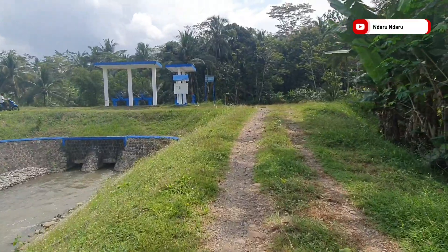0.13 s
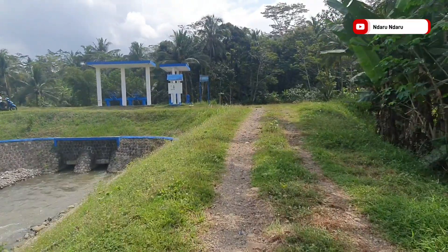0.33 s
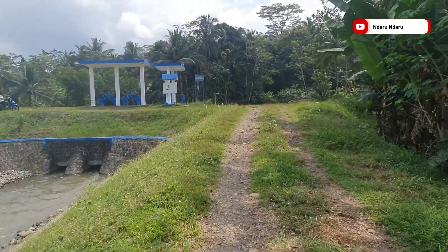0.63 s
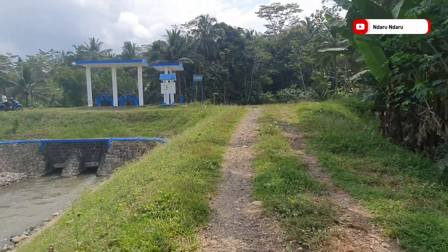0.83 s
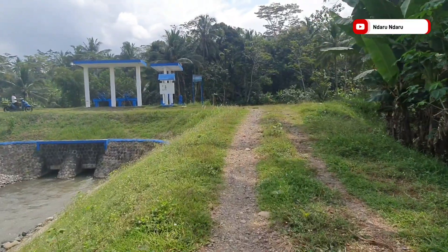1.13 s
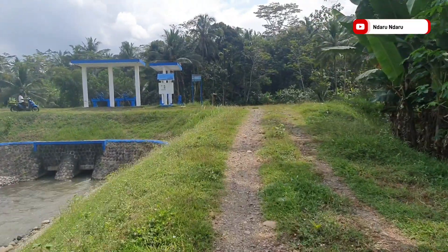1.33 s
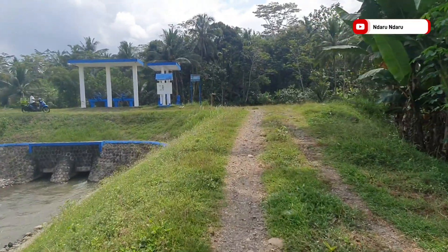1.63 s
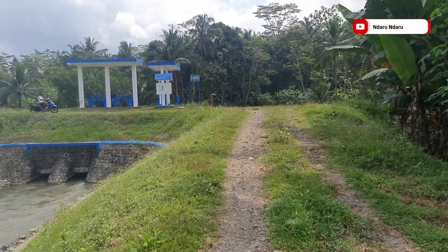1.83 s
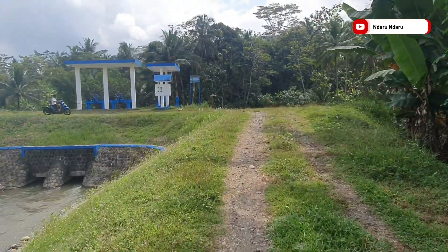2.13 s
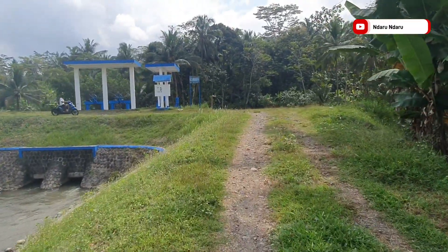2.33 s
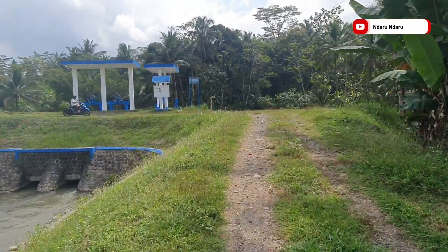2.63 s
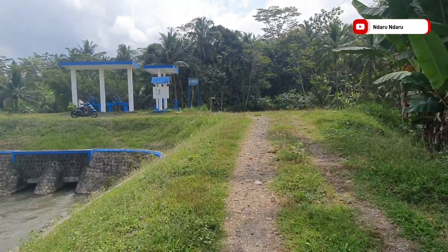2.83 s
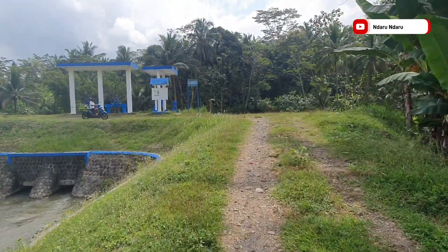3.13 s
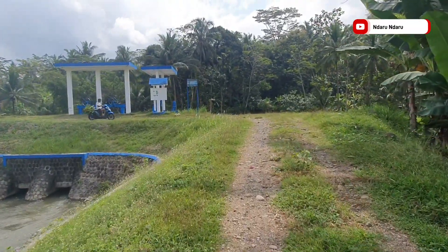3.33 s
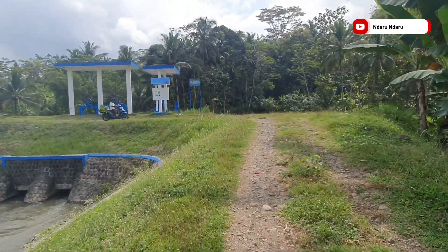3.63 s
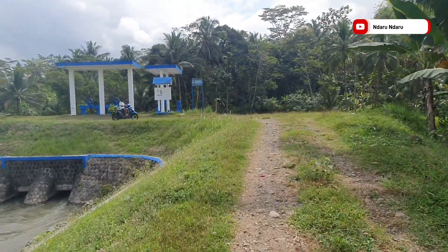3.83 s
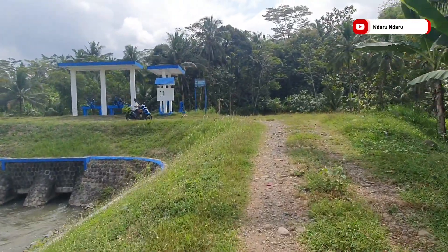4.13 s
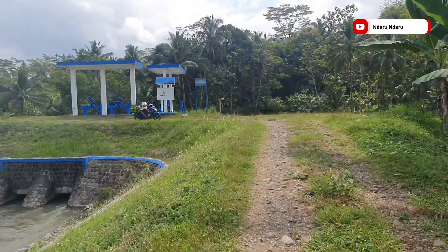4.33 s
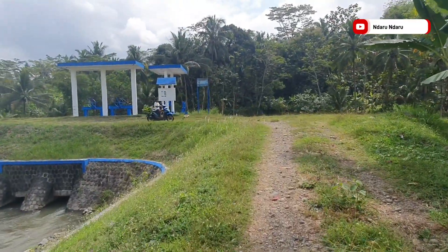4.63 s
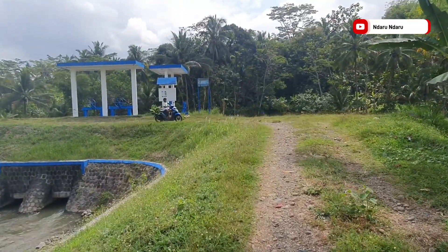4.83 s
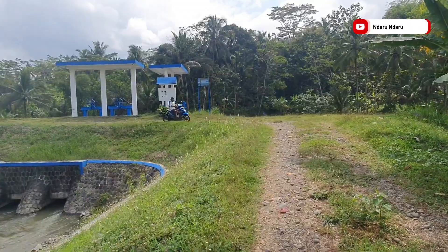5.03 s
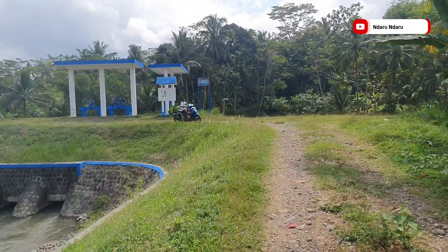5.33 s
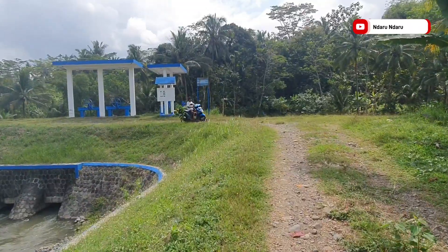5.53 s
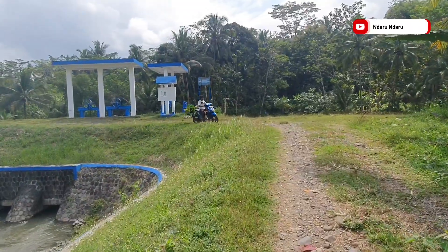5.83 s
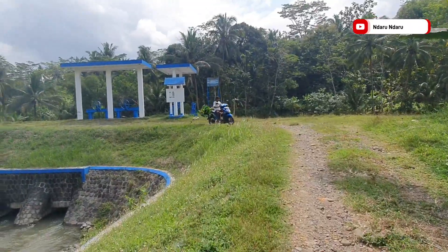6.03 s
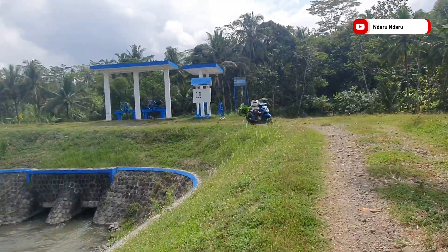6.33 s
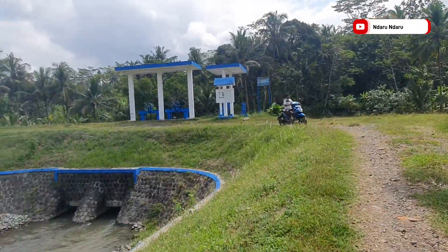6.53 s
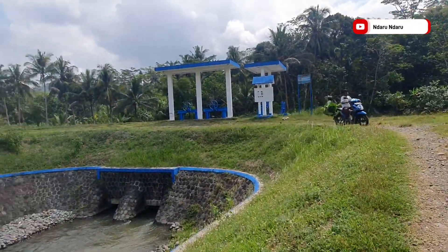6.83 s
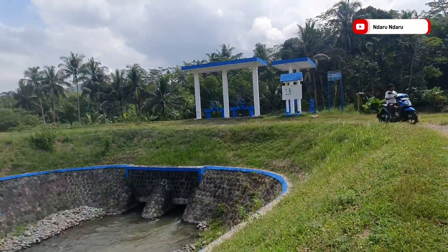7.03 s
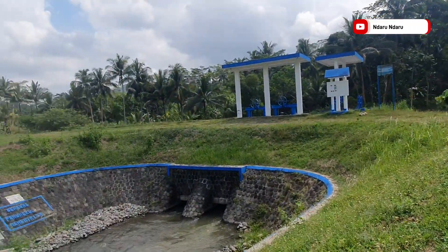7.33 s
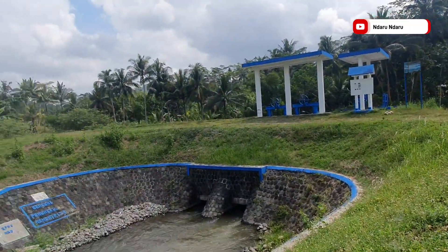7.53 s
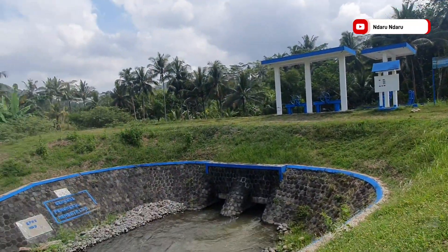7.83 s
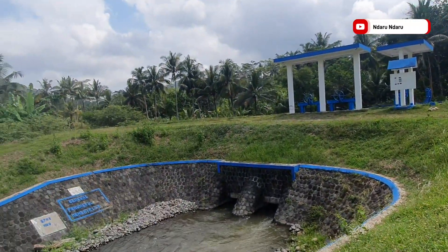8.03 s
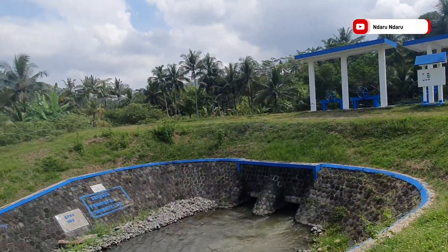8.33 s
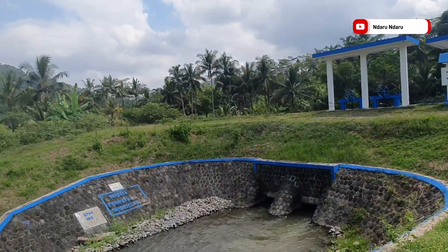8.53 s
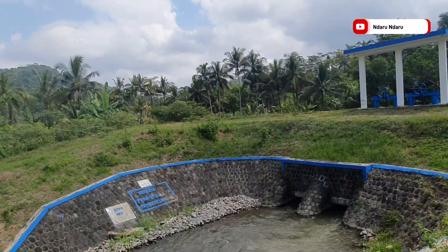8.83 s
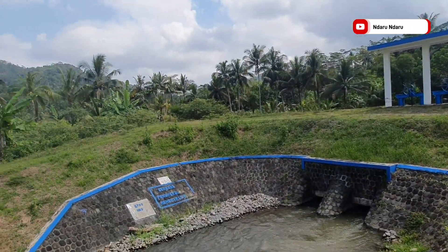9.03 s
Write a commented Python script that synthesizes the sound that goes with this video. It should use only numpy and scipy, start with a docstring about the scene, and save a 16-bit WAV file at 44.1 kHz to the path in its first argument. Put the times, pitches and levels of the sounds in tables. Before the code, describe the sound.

A continuous, grainy hiss of canal water and grit under rolling wheels lasts about nine seconds, nearly level, with tiny fast flickers across its bands. At 0 s a tight burst of hard stone pops strikes, then single pops and bubbly clicks scatter, with clearer knocks near 1.3, 1.6 and 3.2 s. A flurry of small clicks comes around 3.8 s, a dense low gravel crunch at 4.5 s, and a looser patter at 5.1 s. Thin metal pings touch at 5.3 and 6.7 s; a soft crunch falls at 5.75 s. From 6.7 to 7.4 s the hiss shifts colour as the microphone turns towards the water, with several knocks near 7.1 s. Pops then thin out, with one last dry knock near 9.1 s. Very faint rumble and distant motorbike hum stay beneath, in close, dry, uneven stereo.

```python
"""Gravel track beside a canal

A camera rolls slowly beside a stone-lined canal. Water and grit under the wheels make an even, grainy hiss:
noise mixed with ringing grains, flickering band by band. Stones and bubbles pop as short decaying tones;
noise bursts tick and thin metal pings in the treble. Far off lie a low noise rumble and a motorbike's sine hum.
Two microphone ports on the camera body hear it all with unequal colour and phase.
"""
import sys
import numpy as np
from scipy import signal
from scipy.fft import rfft, irfft, next_fast_len
from scipy.io import wavfile
from scipy.ndimage import map_coordinates

SR = 44100
rng = np.random.default_rng(int(sys.argv[2]) if len(sys.argv) > 2 else 0)


def to_wav(sig):
    """Store sig (one row per channel, or 1-D mono) as 16-bit WAV at the path in sys.argv[1].

    Samples outside -1..1 are clipped; the rate is SR.
    """
    pcm = np.clip(np.atleast_2d(sig), -1, 1) * 32767
    pcm = np.round(pcm).astype(np.int16)
    wavfile.write(sys.argv[1], SR, pcm.T)  # frames by channels


N = 405719


def from_db(db):
    """Decibels to gain."""
    return 10 ** (np.asarray(db) / 20)


def rms_one(x):
    """Scale to unit rms."""
    return x / np.sqrt(np.mean(x ** 2) + 1e-20)


def at_hz(rows, hz):
    """Columns of a colour table, read on a log-frequency axis."""
    f, *columns = np.transpose(rows)
    return [np.interp(np.log(hz + 1), np.log(f), column) for column in columns]


def in_time(rows):
    """Columns of a time curve, read at every sample."""
    s, *columns = np.transpose(rows)
    return [np.interp(np.arange(N) / SR, s, column) for column in columns]


def drift(rate_hz):
    """Slow random wander of unit rms: noise twice through a one-pole low-pass, at a twentieth of the rate."""
    pole = np.exp(-40 * np.pi * rate_hz / SR)
    noise = rng.standard_normal(N // 20 + 4002)
    slow = signal.lfilter([1], [1, -2 * pole, pole * pole], noise)[4000:]   # skip the settling
    return np.interp(np.arange(N) / 20, np.arange(len(slow)), rms_one(slow))


def filtered(x, response):
    """Apply a complex response given as a function of frequency."""
    size = next_fast_len(N + 4096)
    hz = np.arange(size // 2 + 1) * SR / size
    return irfft(rfft(x, size) * response(hz), size)[..., :N]


def add_ring(out, at_s, peak_db, hz, rise_s):
    """Add a sine that swells for rise_s and then dies away."""
    t = np.arange(int(12 * rise_s * SR)) / SR
    envelope = from_db(peak_db) * t / rise_s * np.exp(1 - t / rise_s)
    ring = envelope * np.sin(2 * np.pi * hz * t)
    start = round(at_s * SR)
    out[start:start + len(t)] += ring[:N - start]


# Colour of the far engine and air. Each row: frequency in Hz, density in dB per Hz.
RUMBLE_COLOUR = [(24, -24), (45, -10), (65, 5), (115, 3), (160, -23), (400, 2)]
# Swell of the rumble. Each row: time in seconds, level in dB at the right port.
RUMBLE_LEVEL = [(0, -76.5), (2.2, -77), (3.5, -73), (5, -81), (6, -75), (7.2, -73.5), (8.2, -77),
                (9.2, -77)]


def rumble():
    """Far engine and air: noise below 500 Hz, drawn separately for each port and weaker at the left."""
    noise = rng.standard_normal((2, N))
    low = filtered(noise, lambda hz: from_db(at_hz(RUMBLE_COLOUR, hz)[0]) * (hz < 500))
    return from_db(in_time(RUMBLE_LEVEL)[0]) * rms_one(low) * from_db([[-10.5], [0]])


# Firing note of a far motorbike. Each row: time in seconds, centre pitch in Hz,
# centre peak level in dB at the right port.
MOTORBIKE_NOTE = [(0, 62, -96), (4.2, 66, -90), (4.6, 66, -82), (5.4, 65, -80), (5.8, 53, -90),
                  (6.25, 57, -77), (6.6, 58, -86), (7.3, 63, -83), (8.1, 64, -82), (8.4, 65, -88),
                  (9.2, 66, -83)]


def engine_hum():
    """The motorbike's firing note: one sine, wavering a little in pitch and level."""
    hz, level_db = in_time(MOTORBIKE_NOTE)
    wavering_hz = hz * (1 + 0.0202 * drift(2.6))
    phase = 2 * np.pi * np.cumsum(wavering_hz) / SR
    return from_db(level_db + 3.5 * drift(3.3)) * np.sin(phase) * from_db([[-10.5], [0]])


# Bright ticks. Each row: start in seconds, starting noise level in dB before the high-pass.
TICK_HITS = [(0.188, -48), (0.5636, -50), (0.5831, -45), (1.3139, -48), (2.7422, -58), (3.1727, -42),
             (3.756, -39), (4.0138, -50), (5.0604, -48), (5.2984, -44), (5.3774, -62), (6.7251, -51),
             (7.9678, -41), (8.6567, -41)]
TICK_T60_S, TICK_LOW_HZ = 0.013, 9850


def ticks():
    """High-passed noise bursts with a fast decay, drawn separately for each port."""
    out = np.zeros((2, N))
    decay_db = -60 * np.arange(400) / SR / TICK_T60_S
    for s, peak_db in TICK_HITS:
        start = round(s * SR)
        out[:, start:start + 400] += rng.standard_normal((2, 400)) * from_db(peak_db + decay_db)
    return signal.sosfilt(signal.butter(3, TICK_LOW_HZ, "high", fs=SR, output="sos"), out)


# Touches of a small metal part. Each row: start in seconds, peak in dB at the right port.
METAL_TOUCHES = [(5.289, -51), (5.297, -44), (6.74, -48)]
PING_HZ, PING_RISE_S, PING_LEFT_DB = 13250, .002, -17


def pings():
    """A small metal part rings one thin high tone, much weaker at the left port."""
    ping = np.zeros(N)
    for s, peak_db in METAL_TOUCHES:
        add_ring(ping, s, peak_db, PING_HZ, PING_RISE_S)
    return ping * from_db([[PING_LEFT_DB], [0]])


PEBBLE_SPREAD_DB = 2.5   # either side of the mean
PEBBLE_CYCLES = 4.7      # at 1 kHz


def pebbles(start_s, length_s, per_s, mean_db, low_hz, high_hz, cycles=PEBBLE_CYCLES):
    """Rows of small hits at random times and pitches, coloured by the port; higher ones ring more cycles."""
    when, size, pitch = rng.random((round(per_s * length_s), 3)).T
    hz = low_hz * (high_hz / low_hz) ** pitch
    peak_db = mean_db + at_hz(RIGHT_PORT_COLOUR, hz)[0] + PEBBLE_SPREAD_DB * (2 * size - 1)
    return np.transpose([start_s + when * length_s, peak_db, hz, cycles * np.sqrt(hz / 1000)])


# Loose gravel giving way in dense runs of low stones. Each row: start in seconds, length in seconds,
# mean peak in dB before the port's colour.
GRAVEL_CRUNCHES = [(4.508, .026, -38), (5.756, .16, -41)]


def small_hits():
    """Scattered pebbles, longer-ringing bubbles in the race, and runs of crunching gravel."""
    stones = pebbles(0, N / SR, per_s=10, mean_db=-43, low_hz=870, high_hz=4370)
    bubbles = pebbles(0, N / SR, per_s=120, mean_db=-44, low_hz=1058, high_hz=4730, cycles=11)
    runs = [pebbles(s, length_s, per_s=160, mean_db=db, low_hz=634, high_hz=2370)
            for s, length_s, db in GRAVEL_CRUNCHES]
    return np.vstack([stones, bubbles, *runs])


# Stones popping. Each row: start in seconds, peak in dB of the main ring at the right port
# before echoes and band-pass, pitch in Hz, cycles near the peak.
STONE_POPS = [(.012, -23, 1800, 1.7), (.0179, -17.5, 1710, 2.2), (.0181, -25, 3200, 3.5),
              (.0203, -27, 2000, 3), (.028, -31, 1950, 5), (.072, -41, 1700, 6), (.081, -31.5, 1250, 5),
              (.13, -32, 2270, 6), (.0415, -34, 3470, 7.4), (.369, -39, 525, 2), (.3858, -34, 3900, 4),
              (.398, -34, 533, 2), (.465, -32.5, 1710, 11), (.6021, -27, 1260, 1.1), (.669, -28, 2930, 4.7),
              (.7625, -43, 4130, 5), (.9095, -33, 1900, 9), (.947, -35, 3450, 6), (.9495, -33, 4080, 10),
              (.954, -37, 2750, 20), (.962, -41, 3960, 5), (1.0025, -34, 3100, 9), (1.025, -33, 1880, 13),
              (1.0783, -42, 5170, 4), (1.134, -34, 3620, 5), (1.2586, -23, 1590, 1.2),
              (1.325, -25.5, 2020, 3.7), (1.345, -33, 3620, 11), (1.417, -38, 4480, 5),
              (1.4295, -39, 4650, 5), (1.5128, -36, 3700, 5), (1.6235, -26, 1870, 3),
              (1.6249, -29, 3900, 5), (1.962, -28.5, 1780, 3.2), (2.0653, -29, 2810, 3.5),
              (2.163, -31, 1630, 12), (2.1435, -38, 1950, 4), (2.2015, -40, 3950, 10),
              (2.2045, -33, 3100, 5), (2.2065, -35, 3600, 7.4), (2.2505, -34, 2100, 9),
              (2.254, -34, 1290, 9.8), (2.2705, -34, 1550, 7), (2.688, -28, 2160, 4.7),
              (2.284, -33, 1930, 4.3), (2.7448, -32.5, 6450, 8.4), (2.8066, -30, 4600, 4.6),
              (2.914, -34, 2650, 6.5), (3.0175, -31, 1260, 6.6), (3.2165, -24.5, 815, 2.5),
              (3.2165, -25.5, 1350, 3), (3.2225, -30, 1150, 2.8), (3.2428, -37, 1750, 7),
              (3.268, -32, 1590, 3), (3.4796, -31, 1730, 3.6), (3.5614, -30.5, 1350, 5.3),
              (3.619, -24.5, 1880, 2), (3.7515, -37, 2450, 8), (3.757, -31, 1600, 5), (3.769, -35, 1750, 9),
              (3.7672, -35, 4650, 5), (3.784, -31, 1730, 4.1), (3.8125, -37, 2450, 6),
              (3.8325, -35, 2600, 8), (3.8335, -37, 3050, 8), (3.837, -33, 2000, 9), (3.84, -34, 1150, 4),
              (3.846, -34, 2350, 8), (3.852, -36, 2580, 10), (3.863, -33, 1800, 8), (3.863, -36, 2840, 4),
              (3.9203, -38, 3530, 5), (3.934, -35, 4390, 5), (4.0465, -36, 3790, 5), (3.8255, -30, 1420, 8),
              (4.1687, -27, 1790, 5), (4.5114, -25, 1400, 2.5), (4.5137, -31, 700, 4.6),
              (4.5177, -28, 1150, 1.8), (4.5232, -35, 860, 2), (4.5371, -28, 1350, 2),
              (4.5395, -31, 1500, 2), (4.5413, -29, 1100, 2.6), (4.5417, -24, 2000, 4),
              (4.5447, -33, 1900, 2.1), (4.5458, -25, 1140, 2.7), (4.5492, -34, 700, 2),
              (4.5568, -24, 1200, 2.4), (4.5515, -23.5, 1150, 2.8), (4.549, -22.5, 1890, 8),
              (4.5569, -23, 1980, 4), (4.629, -26, 2050, 2.3), (4.644, -28, 2130, 5.1),
              (4.7642, -30.5, 1200, 4.3), (5.0556, -32, 1750, 6.6), (5.0605, -33, 1440, 8),
              (5.0675, -31, 1260, 3.4), (5.079, -36, 680, 3.2), (5.0826, -31, 1890, 6),
              (5.09, -32, 1550, 5), (5.0955, -34, 600, 1.7), (5.1068, -31, 950, 3), (5.1072, -28, 2760, 4),
              (5.1172, -36, 2840, 4), (5.1285, -33, 1940, 4), (5.1315, -31, 724, 2.7),
              (5.145, -30, 1890, 2.7), (5.146, -35, 2840, 4), (5.1663, -24.5, 900, 1.9),
              (5.173, -37, 3050, 8), (5.1785, -34, 2950, 6.5), (5.2275, -36, 1220, 7),
              (5.2324, -30, 2800, 7.7), (5.2318, -28.5, 1200, 4), (5.231, -37, 630, 3.3),
              (5.2806, -31, 1890, 6.8), (5.5602, -36, 4650, 5), (5.3796, -33.5, 6500, 11),
              (5.773, -31.5, 543, 1.3), (5.827, -34, 1540, 4.6), (5.889, -32, 970, 3.1),
              (6.0695, -30, 4300, 3), (6.265, -33, 2960, 13), (6.302, -35, 2950, 8.1),
              (6.5506, -29, 1250, 2.7), (6.5733, -26.5, 2880, 10), (6.6065, -33, 1300, 6.4),
              (6.6668, -31, 1250, 8.7), (6.69, -31, 2750, 5.4), (6.7315, -32.5, 1340, 8),
              (6.7955, -29, 1500, 7.1), (6.865, -34, 1910, 11), (7.015, -35, 1450, 8.8),
              (7.1248, -27, 1500, 5.1), (7.126, -27, 1070, 6.9), (7.136, -34, 2900, 5),
              (7.1372, -26, 1650, 3), (7.1373, -24, 716, 1.6), (7.22, -33, 1090, 7.5),
              (7.234, -24.5, 1350, 3.1), (7.3204, -29, 1300, 2.6), (7.3408, -30, 800, 2),
              (7.3795, -27.5, 2560, 8.8), (7.847, -31, 1020, 3.8), (7.655, -36, 2850, 6.3),
              (7.725, -34, 1550, 10), (7.9505, -32, 2700, 8), (8.195, -34, 2340, 10), (8.211, -35, 2450, 9),
              (8.2165, -37, 2750, 9), (8.217, -38, 3200, 7), (8.293, -34, 750, 3.5),
              (9.0749, -28, 1130, 1.2)]
# Echoes off the track and the frame. Each row: delay in seconds, level in dB.
TRACK_ECHOES = [(.0024, -34), (.0043, -20.5)]
LEFT_LAG_S = .0001
LEFT_SHADOW_SHARE = 0.92   # stones lie closer than the water: only part of the body's shadow


def pops():
    """Each stone or bubble rings a few cycles, shadowed, late and inverted at the left port, and echoes."""
    out = np.zeros((2, N))
    for s, peak_db, hz, cycles in np.vstack([STONE_POPS, small_hits()]):
        rise_s = 0.25 * cycles / hz
        left_db = peak_db + LEFT_SHADOW_SHARE * at_hz(LEFT_PORT_SHADOW, hz)[0]
        for port, (at_s, port_db) in enumerate(((s + LEFT_LAG_S, left_db), (s, peak_db))):
            add_ring(out[port], at_s, port_db, hz, rise_s)
            # an upper ring, strongest on big, low stones
            add_ring(out[port], at_s, port_db - 20 - hz / 180, 1.69 * hz, rise_s)
    echoes = sum(from_db(db) * np.roll(out, round(lag_s * SR), axis=1) for lag_s, db in TRACK_ECHOES)
    band = signal.butter(3, [350, 7000], "band", fs=SR, output="sos")
    return signal.sosfilt(band, out + echoes) * [[-1], [1]]


GRIT_PER_S, GRIT_CYCLES = 2500.0, 7.2   # mean rate before surges; cycles for each pole pair to fall 60 dB
GRIT_SHARE = 0.11                       # of the power


def grainy_noise(surge, spread_db):
    """Smooth water noise mixed with grains of unequal size, each ringing in one of 16 pitch bands."""
    born = rng.random(N) < GRIT_PER_S * surge / SR
    size_db = spread_db * np.minimum(rng.exponential(1, N), 4.0)
    grains = born * from_db(size_db) * rng.choice([-1, 1], N)
    pitch_index = (16 * rng.random(N) ** .6).astype(int)   # small, high grains are the most common
    grit = 0
    for k, hz in enumerate(np.geomspace(380, 14500, 16)):
        r = from_db(-60 * hz / (GRIT_CYCLES * SR))
        mode = [(1 - r * r) / 2, 0, (r * r - 1) / 2, 1, -2 * r * np.cos(2 * np.pi * hz / SR), r * r]
        # two passes: soft start, dark skirts; the tiny offset keeps the filter from stalling
        ring = signal.sosfilt([mode, mode], grains * (pitch_index == k) + 1e-18)
        grit = grit + (hz / 3000) ** -.12 * ring
    return np.sqrt(1 - GRIT_SHARE) * rng.standard_normal(N) + np.sqrt(GRIT_SHARE) * rms_one(grit)


# Colour at the right port. Each row: frequency in Hz, density in dB per Hz.
RIGHT_PORT_COLOUR = [(200, -22.5), (400, -9.5), (800, -4), (1250, 0.4), (1500, -1), (1850, -0.06),
                     (2300, -3), (2950, 0), (3300, -3.5), (4000, -6.5), (5200, -12.5), (6500, -14.5),
                     (7500, -27), (8800, -50.5), (10300, -41.5), (11800, -24.5), (15500, -25)]
MIDDLE_FLICKER_DB, OUTER_FLICKER_DB = .85, 1.65   # the body of the hiss is the most even


def rush(level_db, low_db, bright_db, upper_db, treble_db):
    """Two unrelated draws of the hiss, in half-octave steps that swell partly together, partly alone."""
    crunch = drift(30)   # loose gravel gives way in bursts across all bands
    raw = np.array([grainy_noise(from_db(1.8 * crunch), spread_db=3.5) for _ in range(2)])
    size = next_fast_len(N)
    hz = np.arange(size // 2 + 1) * SR / size
    spectrum = rfft(raw, size) * from_db(at_hz(RIGHT_PORT_COLOUR, hz)[0])
    octave = np.clip(np.log2(hz / 250 + 1e-9), -1, 6.5)
    out = 0
    for k in np.arange(-1, 7, .5):   # band centre in octaves above 250 Hz; windows sum to one
        window = np.cos(np.pi * np.clip(octave - k, -.5, .5)) ** 2
        colour_db = low_db * (k < 2.2) + treble_db * (k > 4.8)
        colour_db = colour_db + bright_db * (3.2 < k < 4.2) + upper_db * (k == 4.5)
        patchy_db = MIDDLE_FLICKER_DB if 2.2 < k < 4.8 else OUTER_FLICKER_DB
        flicker_db = 0.49 * crunch + patchy_db * drift(17)
        out = out + from_db(colour_db + flicker_db) * irfft(spectrum * window, size)[:, :N]
    return from_db(level_db) * rms_one(out)


# Left port against the right. Each row: frequency in Hz, gain in dB, likeness from 0 to 1, phase lead in rad.
LEFT_PORT_SHADOW = [(100, -11.5, 0.45, 3.4), (229, -8, 1, 1.73), (403, -4, 0.95, 2.65),
                    (1030, -6.5, 0.82, 2.7), (1380, -10, .7, 2.8), (1720, -13.5, .3, 1.7),
                    (2070, -11, .5, .95), (2410, -8, .75, 1.4), (2760, -6.5, .85, 1.9),
                    (3100, -6.5, .8, 2.5), (3450, -7.5, .55, 3.2), (3800, -8, .45, 4.3),
                    (4480, -7, .4, 6.4), (5170, -.5, .55, 8.2), (5860, -1, .45, 9.8), (6550, -1, .4, 12.1),
                    (7240, 3, .2, 15.3), (8300, 9, .1, 19), (10300, 13.5, 0.1, 26), (11360, 1.5, 0.1, 30)]


def left_port(shared, own):
    """The left port hears part of the same hiss, part its own, shadowed and shifted in phase by the body."""
    def shadow(hz, part):
        gain_db, alike, lead = at_hz(LEFT_PORT_SHADOW, hz)
        mix = (alike, np.sqrt(1 - alike ** 2))[part]
        return from_db(gain_db) * np.exp(1j * lead) * mix
    return filtered(shared, lambda hz: shadow(hz, 0)) + filtered(own, lambda hz: shadow(hz, 1))


def heading(ports, shading, share):
    """The colour at both ports fades over to that of another heading of the camera."""
    turned = filtered(ports, lambda hz: from_db(at_hz(shading, hz)[::-1]))   # columns put left first
    return ports + np.clip(share, 0, 1) * (turned - ports)


# The rush as the camera rolls. Each row: time in seconds, level in dB before the headings' colours,
# lift of the 2.5-4 kHz wash in dB, lift of the 4.5-7 kHz wash in dB.
RUSH_CURVE = [(0, -39, -0.5, -5.5), (.3, -40, -1, -2), (.6, -39, -1, -2.5), (1.3, -39, -0.5, -3),
              (1.9, -40, -1.5, -0.5), (2.6, -40, 0.5, 0.67), (3.2, -40.5, -1.5, 1), (3.8, -39.5, 1.5, 0.69),
              (4.3, -40.5, -1.5, 0), (4.7, -41, 0.5, 1.3), (5.1, -39.5, 0.5, -0.0067),
              (5.4, -41.5, 0.5, 1.7), (5.65, -42, -3, 0.5), (6, -42, 0, 1.7), (6.7, -41, 1.5, 2.2),
              (7.1, -41, 3.2, 2.5), (7.5, -41, 6.5, -0.8), (8.3, -41, 5.5, -1.8), (9.2, -40.5, 6, -2.5)]
# The camera turns, so water reaches the left port sooner or later. Each row: time in seconds,
# extra lag in microseconds.
TURN_LAG = [(0, -1), (2.6, -5), (4.8, 16), (6.1, 22), (6.7, -1), (8, -34), (9.2, -40)]
# At first the camera heads along the bank. Each row: frequency in Hz, right gain in dB, left gain in dB.
ALONG_BANK = [(900, 0, 1), (1250, -0.5, -1), (1500, -.5, 0), (1850, 1.5, -4), (2300, 0, 1.5),
              (2950, -0.5, -1), (3480, 1.5, 0), (4500, 0.8, 1.2)]
# Swung towards the water, the body shades both ports anew. Each row: frequency in Hz,
# right gain in dB, left gain in dB.
TOWARDS_WATER = [(940, -1, -1.5), (1400, 0, -5.5), (1750, 0.5, 0), (2100, -0.5, 2), (2750, -4.5, -4),
                 (3200, -5.5, -8), (3870, -5.5, -6), (4520, -7.5, -2.5), (5230, 0, -0.5), (6000, 2, 1),
                 (7900, -0.5, 0)]
FIRST_END_S, FIRST_FADE_S = 3, 1.5
SWING_START_S, SWING_LENGTH_S = 6.66, 0.69
LOW_RISE_DB_PER_S, TREBLE_RISE_DB_PER_S = 0.4, 0.23   # bottom and top grow as the culvert nears


def water_and_grit():
    """The hiss at both ports, its delay and colour following the camera's turns."""
    level_db, bright_db, upper_db = in_time(RUSH_CURVE)
    s = np.arange(N) / SR
    from_middle_s = s - N / 2 / SR
    low_db, treble_db = LOW_RISE_DB_PER_S * from_middle_s, TREBLE_RISE_DB_PER_S * from_middle_s
    shared, own = rush(level_db, low_db, bright_db, upper_db, treble_db)
    lag = in_time(TURN_LAG)[0] * 1e-6 * SR   # samples
    left = map_coordinates(left_port(shared, own), [np.arange(N) - lag], order=5, mode="mirror")
    water = heading(np.array([left, shared]), ALONG_BANK, (FIRST_END_S - s) / FIRST_FADE_S)
    return heading(water, TOWARDS_WATER, (s - SWING_START_S) / SWING_LENGTH_S)


def scene():
    """Rumble, hum, hits and hiss at the left and right ports."""
    return rumble() + engine_hum() + ticks() + pings() + pops() + water_and_grit()


def record(dry):
    """A steep low-pass removes the top above 15.6 kHz."""
    return signal.sosfilt(signal.ellip(12, .5, 80, 15600, fs=SR, output="sos"), dry)


dry = scene()
out = record(dry)
to_wav(out)
```